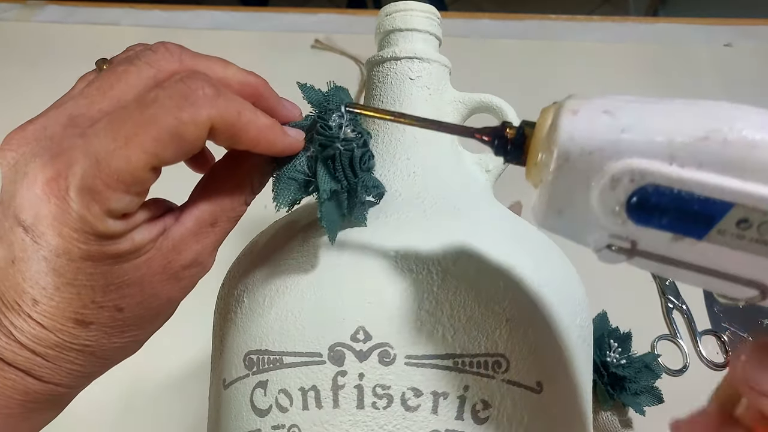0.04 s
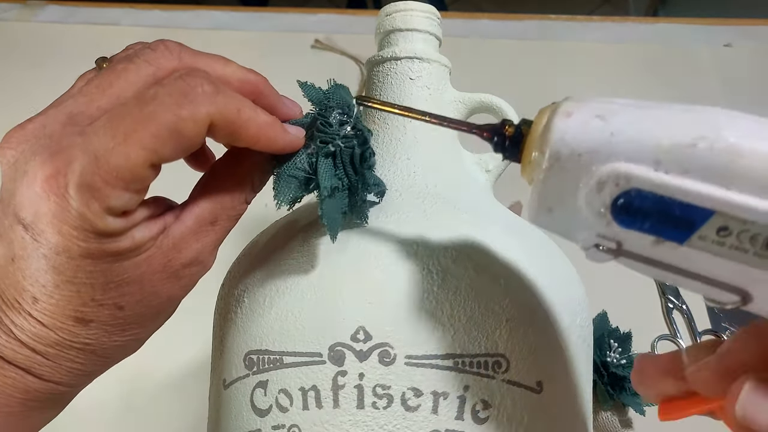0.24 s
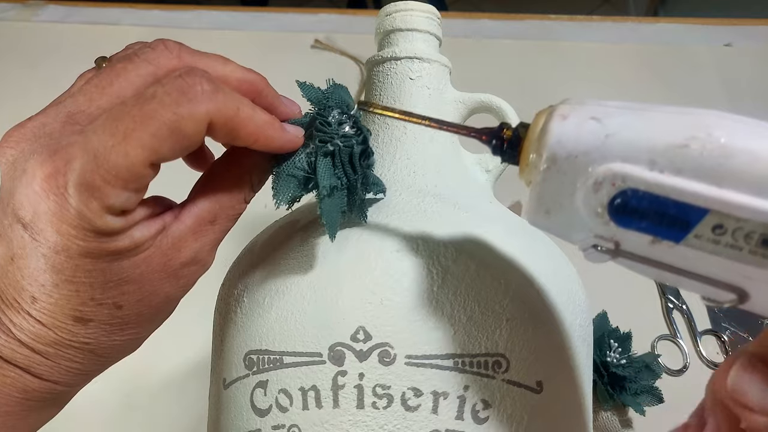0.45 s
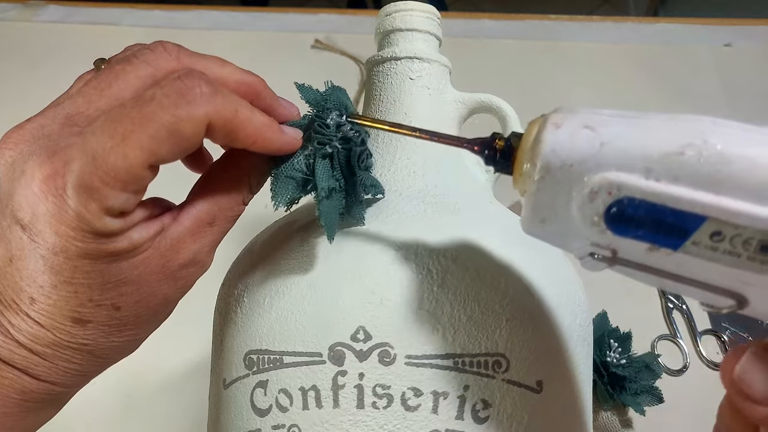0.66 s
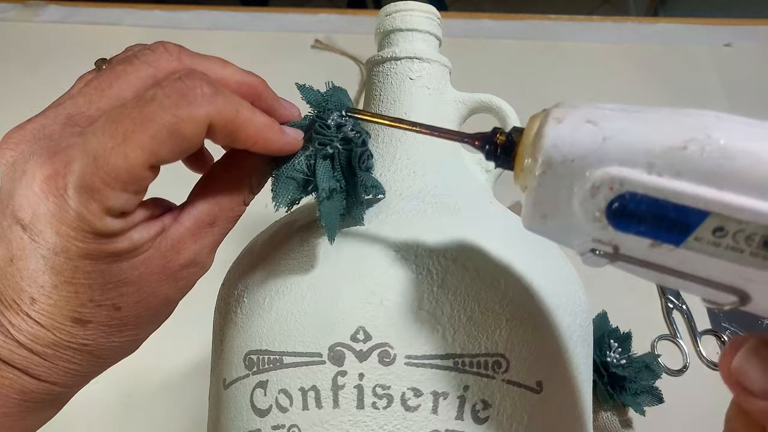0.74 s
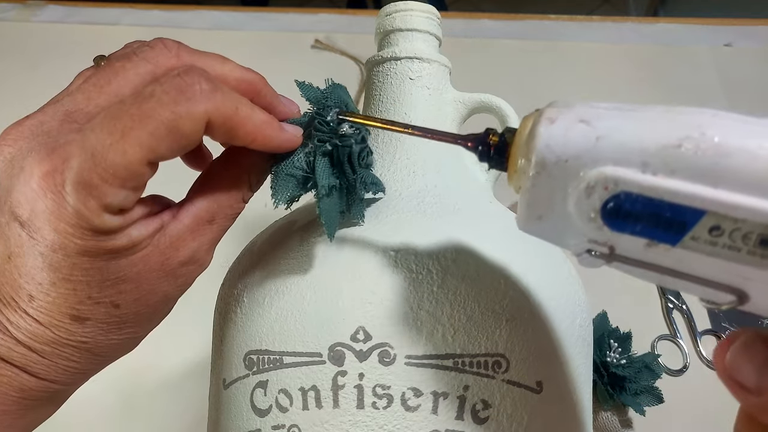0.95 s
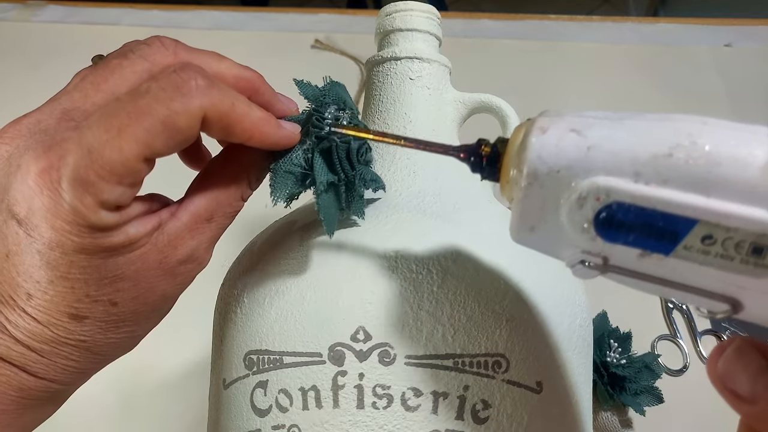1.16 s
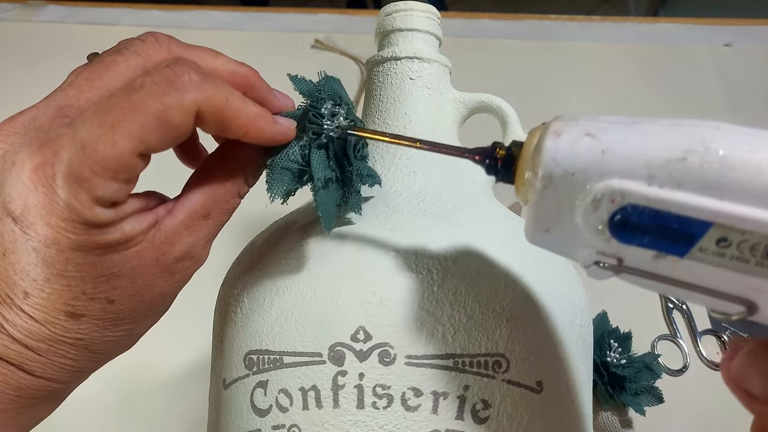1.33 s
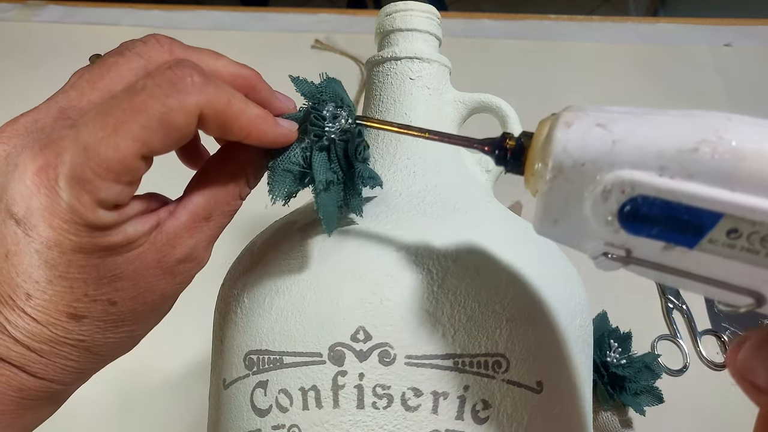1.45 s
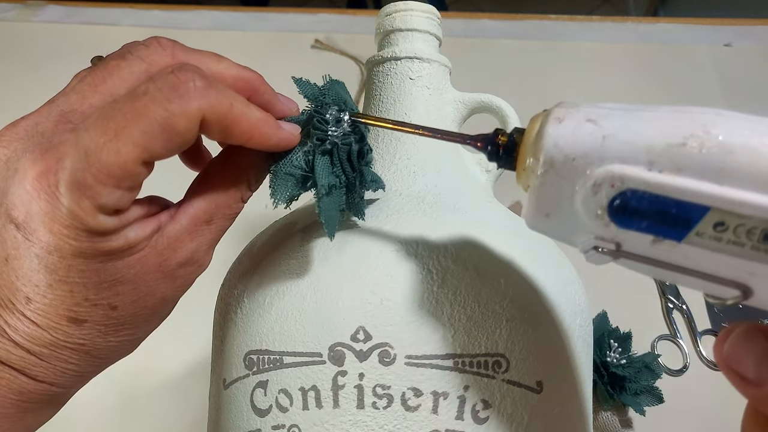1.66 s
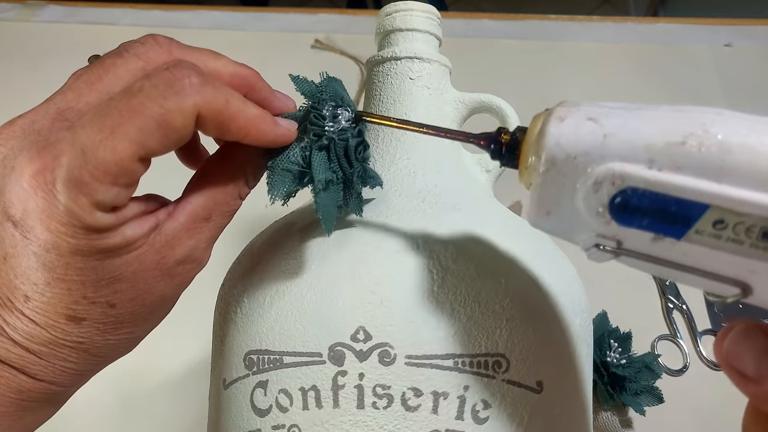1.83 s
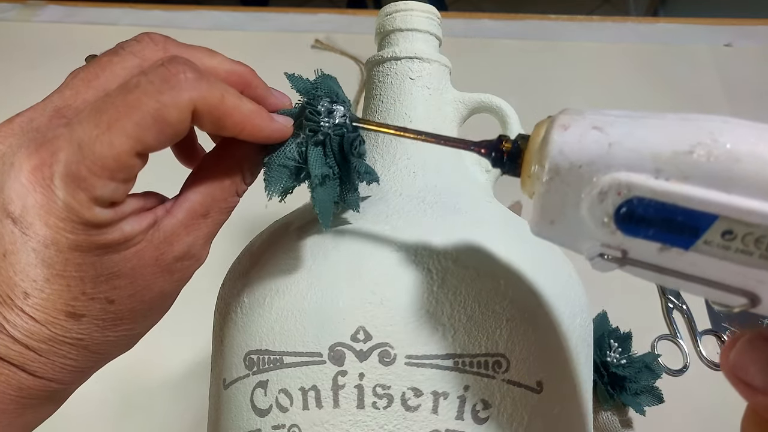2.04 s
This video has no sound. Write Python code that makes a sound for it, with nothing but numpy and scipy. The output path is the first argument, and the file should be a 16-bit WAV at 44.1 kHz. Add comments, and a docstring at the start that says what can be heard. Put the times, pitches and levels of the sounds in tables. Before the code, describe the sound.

Plastic glue gun trigger: fading creak, one sharp clack, then a slowing ratchety creak ending in clicks

```python
"""A creak dies away first, close by: a hot glue gun is let go over a craft table in a quiet room.
The trigger snaps back and ticks, then a new squeeze creaks: the slips slow and harden into clicks.
Each contact on plastic is a rough burst of noise plus a few short rings. The room answers with
a late slap and a short tail, over air noise, a low hum, handling rumble and faint regular ticks."""
import sys
import numpy as np
from scipy import signal
from scipy.fft import rfft, irfft
from scipy.io import wavfile

SR = 44100
rng = np.random.default_rng(int(sys.argv[2]) if len(sys.argv) > 2 else 0)


def output_pcm(signal):
    """Save a mono or channel-first signal as 16-bit PCM at the path in sys.argv[1].

    Samples are clipped to [-1, 1] before scaling.
    """
    pcm = np.clip(np.atleast_2d(signal).T, -1, 1) * 32767
    wavfile.write(sys.argv[1], SR, np.round(pcm).astype(np.int16))


N = 92610  # length in samples: 2.1 s


def amp(db):
    """Turns decibels into a gain."""
    return 10 ** (np.asarray(db) / 20)


def unit(x):
    """Scales a sound to an rms of 1."""
    return x / np.sqrt(np.mean(x ** 2) + 1e-20)


def spectrum(points, hz):
    """Reads a table over frequency, on a log axis."""
    f, value = np.transpose(points)
    return np.interp(np.log(hz + 1), np.log(f + 1), value)


def curve(points, s):
    """Reads a table over time."""
    return np.interp(s, *np.transpose(points))


def add(mix, s, sound):
    """Mixes a sound in, starting at s seconds."""
    part = mix[..., max(round(s * SR), 0):][..., :sound.shape[-1]]
    part += sound[..., :part.shape[-1]]


def colour(points, size=2048):
    """Builds a filter with the given spectrum and unit energy that never sounds ahead of its input."""
    hz = abs(np.fft.fftfreq(size, 1 / SR))
    log_gain = np.log(amp(np.maximum(spectrum(points, hz), -90)))
    # minimum phase: the filter's energy comes as early as it can
    response = np.exp(np.conj(signal.hilbert(log_gain)))
    h = np.fft.ifft(response).real[:size // 2]
    return h / np.linalg.norm(h)


def noise(points):
    """Makes steady noise with the given spectrum and an rms of 1."""
    gain = amp(spectrum(points, np.fft.rfftfreq(N, 1 / SR)))
    return unit(irfft(rfft(rng.standard_normal(N)) * gain, N))


def sent(sound, echo_db):
    """Gives two rows: the direct sound and its share for the room's echo."""
    return np.array([sound, sound * amp(echo_db)])


# spectrum of the room air: (frequency [Hz], level [dB per Hz])
AIR_COLOUR = [(12, -38.5), (20, -7.5), (43, -7.5), (63, -23.5), (113, -21.5), (158, -2), (216, -7),
              (328, -6), (357, -14.5), (388, -9), (472, -12.5), (873, -15.5), (1610, -23.5), (1810, -21.5),
              (2820, -26), (13900, -31), (16000, -32)]
# rumble of the hand on the gun: (time [s], level [dB])
HANDLING_LEVEL = [(0, -70), (.15, -81), (.225, -59.5), (.3, -85), (.58, -84), (.68, -56.5), (.77, -64.5),
                  (.85, -71), (.97, -62), (1.15, -82), (2.1, -89)]
AIR_DB, HUM_HZ, HUM_DB = -66, 157.5, -74


def background():
    """Room air and handling rumble are shaped noise; the hum is a sine with a slowly wavering phase."""
    t = np.arange(N) / SR
    waver = noise([(1, -1.5), (6, 0), (20, -40), (100, -120)])
    hum = amp(HUM_DB) * unit(np.sin(2 * np.pi * HUM_HZ * t + .5 * waver))
    low_noise = noise([(10, -12), (33, 0.5), (70, -10.5), (150, -21.5), (600, -58), (4000, -110)])
    rumble = amp(curve(HANDLING_LEVEL, t)) * low_noise
    return amp(AIR_DB) * noise(AIR_COLOUR) + hum + rumble


# spectrum of a tiny tick: (frequency [Hz], level [dB])
TICK_COLOUR = [(3000, -30), (7000, -7.5), (10000, 0), (12500, -7), (16000, -10)]
FIRST_TICK_S, TICK_GAP_S, TICK_DB = .0323, .03339, -51


def ticking():
    """Faint electrical ticking: one short, high click repeats at an even pace, about 30 a second."""
    out, tick = np.zeros(N), amp(TICK_DB) * colour(TICK_COLOUR)
    for s in np.arange(FIRST_TICK_S, N / SR, TICK_GAP_S):
        add(out, s, tick)
    return out


# how long the room rings: (frequency [Hz], time to fade by 60 dB [s])
ROOM_T60 = [(200, .3), (1500, 0.31), (4000, 0.2768), (8000, 0.28), (15000, 0.77)]
# tone of the room: (frequency [Hz], level [dB])
ROOM_COLOUR = [(100, -10), (700, -0.5), (2000, 1.5), (6000, -1), (10000, -2), (15000, -4)]
SLAP_S, SLAP_DB, TAIL_DB, NEAR_DB = .0563, 0.5, -4.5, -15.5


def room(direct, send):
    """Reflections are fading noise: faint near ones, then a late slap that starts a diffuse tail."""
    hz, t, z = signal.stft(rng.standard_normal((2, SR // 2)), SR, nperseg=256)
    fade_db = 60 * t / spectrum(ROOM_T60, hz)[:, None]
    z = z * amp(spectrum(ROOM_COLOUR, hz)[:, None] - fade_db)
    near, tail = signal.istft(z, SR, nperseg=256)[1]
    near = near * np.exp(-np.arange(len(near)) / SR / 0.018)  # near reflections fade sooner
    late = amp(TAIL_DB) * tail / np.linalg.norm(tail)
    late[0] += amp(SLAP_DB)
    out = direct + amp(NEAR_DB) * signal.fftconvolve(direct, near / np.linalg.norm(near))[:N]
    add(out, SLAP_S, signal.fftconvolve(send, late)[:N])
    return out


# spectrum of the earlier creak in the room: (frequency [Hz], level [dB per Hz])
LINGER_COLOUR = [(120, -49), (200, -16.5), (259, -9), (465, -22), (671, 0), (1230, -21.5), (1370, 1.5),
                 (2210, -5.5), (3970, -1), (4600, -5), (6050, -5), (13800, -20.5), (16000, -58.5)]


def lingering(start_db=-45, hold_s=.04, fall_db_per_s=190):
    """The previous creak still hangs in the room: shaped noise holds briefly, then dies away."""
    t = np.arange(N) / SR
    return noise(LINGER_COLOUR) * amp(start_db - fall_db_per_s * np.maximum(t - hold_s, 0))


# spectrum of a soft bump: (frequency [Hz], level [dB per Hz])
BUMP_COLOUR = [(30, -2), (450, -6), (1000, -6), (4000, -23), (12000, -31)]
BUMP_S, BUMP_DB, BUMP_DECAY_S = 2.069, -55, 0.0084


def bump():
    """A soft, dull touch near the end: a quickly fading puff of mostly low noise."""
    out = np.zeros(N)
    fade = np.exp(-np.arange(N) / SR / BUMP_DECAY_S)
    add(out, BUMP_S, amp(BUMP_DB) * fade * noise(BUMP_COLOUR))
    return out


# decay of the crack's noise, then of its weaker, longer part
CRACK_S, RING_S, RING_DB = 0.00097, 0.0064, -13
# how gradually the noise and the rings start
KNOCK_SWELL_S, RISE_S = .0005, .0005


def strike(modes, modes_db, crack, crack_db, tilt_db=0, crack_s=CRACK_S, swell_s=KNOCK_SWELL_S, size=4096):
    """One contact on plastic: a rough crack of noise and a few short rings of the part."""
    t = np.arange(size) / SR
    decay = np.exp(-t / crack_s) + amp(RING_DB) * np.exp(-t / RING_S)
    grit = rng.standard_normal(size) * decay * (1 - np.exp(-t / swell_s))
    sound = amp(crack_db) * signal.fftconvolve(grit / np.linalg.norm(grit), crack)[:size]
    # every contact rings a little differently in loudness and pitch
    for (hz, db, t60), (gain, detune) in zip(modes, rng.standard_normal((len(modes), 2))):
        level = amp(modes_db + db + 1.4 * gain - 60 * t / t60)
        ring = level * np.sin(2 * np.pi * hz * (1 + 0.0037 * detune) * t)
        sound = sound + ring * (1 - np.exp(-t / RISE_S))
    # tilt the tone around 3 kHz, staying flat below 500 Hz
    octaves = np.log2(np.maximum(np.fft.rfftfreq(2 * size, 1 / SR), 500) / 3000)
    return irfft(rfft(sound, 2 * size) * amp(tilt_db * octaves))[:size]


def hits(events, modes, modes_db, crack_points, crack_db):
    """Plays a table of contacts on one part of the gun."""
    out, crack = np.zeros((2, N)), colour(crack_points)
    for s, db, tilt_db, echo_db in events:
        add(out, s, sent(amp(db) * strike(modes, modes_db, crack, crack_db, tilt_db), echo_db))
    return out


# trigger against housing; the faint rows at .1648 and .4893 s are the room's late slap of the knocks 56 ms
# before them: (time [s], relative level [dB], treble tilt [dB per octave], echo [dB])
KNOCKS = [(.1085, -37, -0.5, 5), (.1648, -55, 9, -32), (.2215, -1, 0, -17), (.433, -24, 1.5, -3.5),
          (.4893, -34.5, -2.5, -12)]
# rings of the housing: (frequency [Hz], relative level [dB], time to fade by 60 dB [s])
HOUSING_RINGS = [(780, -7, .024), (1020, -12, 0.025), (1440, -2, 0.014), (1670, 2.5, 0.017),
                 (2085, -11.5, 0.02), (2608, -3, 0.022), (3020, -14, .018), (3230, -14, .018),
                 (3800, -13.5, .018), (4840, -9.5, .015), (5900, -12.5, .015), (6790, -10, 0.025),
                 (7524, -14.5, .014), (10450, -27.5, .015)]
# spectrum of a housing crack: (frequency [Hz], relative level [dB per Hz])
HOUSING_CRACK = [(35, -55), (60, -25.5), (492, -27), (803, -7.5), (1200, -28.5), (1410, -0.5), (1700, -4.5),
                 (1910, -11), (3190, -11), (4220, -24), (4860, -23), (6740, -16.5), (8710, -31.5),
                 (14600, -44), (16000, -53.5)]
HOUSING_DB, HOUSING_CRACK_DB = -11, 10


def knocks():
    """The trigger snaps back and ticks against the housing, which cracks and rings."""
    return hits(KNOCKS, HOUSING_RINGS, HOUSING_DB, HOUSING_CRACK, HOUSING_CRACK_DB)


# clicks under load: (time [s], relative level [dB], treble tilt [dB per octave], echo [dB])
CLICKS = [(.7555, -17, -2, -5.5), (.769, -15.5, -3.5, -8), (.7835, -16, -0.5, -8.5),
          (.8003, -13, -0.5, -8.5), (.8183, -11, -2, -5.5), (.8357, -11.5, -2.5, -5),
          (.8565, -10, -2.5, -5.5), (.8785, -13, -2, -9), (.908, -4, -1, -5), (.936, -2.5, -0.5, -9.5),
          (.963, -1.5, -2, -12), (.997, -1.5, 0, -14), (1.0533, -4.5, 3, -9.5), (1.0745, 5, 0, -14.5)]
# rings of the trigger: (frequency [Hz], relative level [dB], time to fade by 60 dB [s])
TRIGGER_RINGS = [(657, -10.5, 0.017), (1420, -11, .029), (1867, -7.5, .025), (2000, -4.5, .028),
                 (2535, -4, 0.039), (2748, -11, .03), (3107, -7, .03), (3590, -1.5, .025),
                 (3953, -2.5, 0.027), (4740, -5.5, .02), (5500, -8, .02), (6430, -4, .019),
                 (7780, -8, .018), (8370, -10, .018)]
# spectrum of a trigger crack: (frequency [Hz], relative level [dB per Hz])
TRIGGER_CRACK = [(59, -48), (100, -28), (150, -14), (492, -17), (648, -4), (991, -17), (1310, -15),
                 (1420, -5), (1550, -7), (2000, -1), (2370, -6.5), (3780, -0.5), (4290, -9), (4570, -5),
                 (5190, -12), (6560, -9.5), (9020, -15), (10000, -18), (16000, -35)]
TRIGGER_DB, TRIGGER_CRACK_DB = -27, -2


def clicks():
    """The loaded trigger clicks, each time with a crack and the rings of its plastic."""
    return hits(CLICKS, TRIGGER_RINGS, TRIGGER_DB, TRIGGER_CRACK, TRIGGER_CRACK_DB)


# high rings of the feed: (frequency [Hz], relative level [dB], time to fade by 60 dB [s])
SING_RINGS = [(5840, -4.5, 0.021), (6080, -3, .022), (6250, 0.5, 0.025), (6480, -5.5, .016)]
# strength of those rings: (time [s], level [dB])
SING_LEVEL = [(.53, -70), (.565, -54.5), (.605, -41.5), (.66, -38.5), (.72, -48.5), (.8, -66)]


def sing(s, size=4096):
    """One slip sets off a high ring: a few fading sines near 6 kHz."""
    t = np.arange(size) / SR
    out = np.zeros(size)
    for hz, db, t60 in SING_RINGS:
        out += amp(curve(SING_LEVEL, s) + db - 60 * t / t60) * np.sin(2 * np.pi * hz * t)
    return out


# pace of the slips under the squeeze: (time [s], time to the next slip [s])
SLIP_GAP = [(.53, .00382), (.58, .00499), (.615, .008), (.64, .01259), (.745, .01406), (.795, .01854),
            (.835, .01729), (.865, .02708), (1.025, .03509)]
# force of those slips: (time [s], relative level [dB])
SLIP_FORCE = [(.53, -38.5), (.565, -22.5), (.61, -9.5), (.655, -4.5), (.75, -7), (.81, -10.5), (.87, -8.5),
              (.95, -8), (1.025, -13)]
# last slips of the previous squeeze: (time [s], relative level [dB])
LAST_SLIPS = [(.0035, -20), (.0095, -5), (.0243, -10), (.0375, -12), (.0496, -17.5), (.060, -14)]
# rings of the feed: (frequency [Hz], relative level [dB], time to fade by 60 dB [s])
FEED_RINGS = [(700, -14.5, 0.033), (1470, -13, 0.018), (2050, -6, .015), (2630, -3.5, 0.04),
              (3170, -7.5, .015), (3910, -5, 0.019), (5400, -6.5, .015), (6200, -2, .018),
              (6770, -4.5, .012), (8900, -7, .012), (9600, -8, .012)]
# spectrum of a feed crack and of the rub: (frequency [Hz], relative level [dB per Hz])
FEED_CRACK = [(59, -50), (100, -22.5), (156, -7.5), (219, -19.5), (365, -17), (691, -4), (854, -10),
              (1280, -12), (1420, -5.5), (2220, -5.5), (2580, -2), (4020, -3.5), (4380, -12), (6290, -7),
              (8110, -16), (9610, -10.5), (16000, -38)]
FEED_DB, FEED_CRACK_DB, RUB_DB = -32, -9, -22
SLIP_ECHO_DB, LAST_ECHO_DB = -5, -11.5
# a slip's crack is crisper than a knock's
SLIP_CRACK_S, SLIP_SWELL_S = .0009, .00005


def feed():
    """The glue stick's feed catches and slips, ever more slowly overall, with a faint rub between."""
    out, crack = np.zeros((2, N)), colour(FEED_CRACK)

    def slip(db):
        """One slip: a crisp crack and the rings of the feed."""
        return amp(db) * strike(FEED_RINGS, FEED_DB, crack, FEED_CRACK_DB, 0, SLIP_CRACK_S, SLIP_SWELL_S)

    s = SLIP_GAP[0][0]
    while s < SLIP_GAP[-1][0]:
        add(out, s, sent(slip(curve(SLIP_FORCE, s)) + sing(s), SLIP_ECHO_DB))
        s += curve(SLIP_GAP, s)
    for s, db in LAST_SLIPS:
        add(out, s, sent(slip(db), LAST_ECHO_DB))
    # the rub follows the force and all but vanishes outside the squeeze
    force = amp(np.interp(np.arange(N) / SR, *np.transpose(SLIP_FORCE), left=-99, right=-99))
    rub = amp(RUB_DB + FEED_DB) * force * noise(FEED_CRACK)
    return out + sent(rub, SLIP_ECHO_DB)


def scene():
    """The gun's three parts sound in the room, over the quieter layers."""
    direct, send = knocks() + clicks() + feed()
    return (background() + ticking() + lingering() + bump() + room(direct, send))[None]


def record(dry, edge_hz=16100):
    """Removes the highest treble with a steep low-pass filter."""
    low_pass = signal.firwin(361, edge_hz, window=("kaiser", 8), fs=SR)
    return signal.oaconvolve(dry, low_pass[None], "same")


dry = scene()
out = record(dry)
output_pcm(out)
```